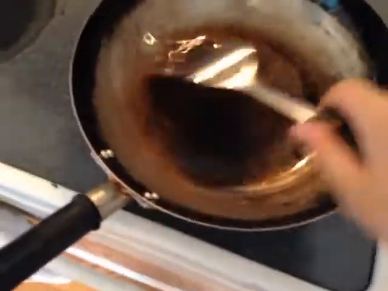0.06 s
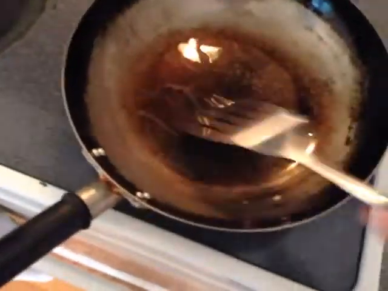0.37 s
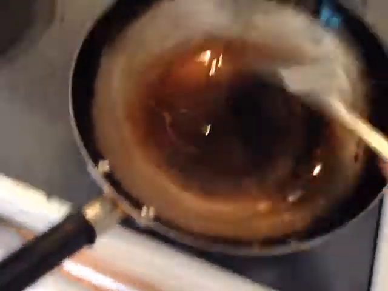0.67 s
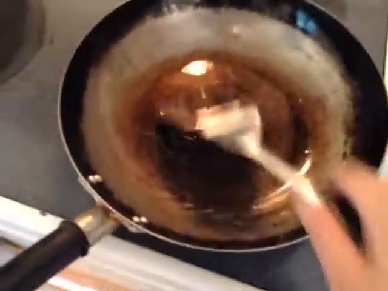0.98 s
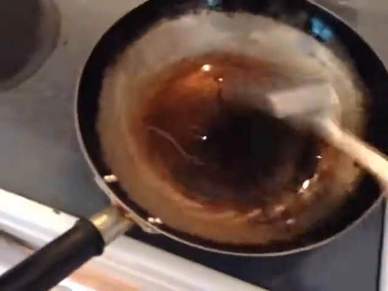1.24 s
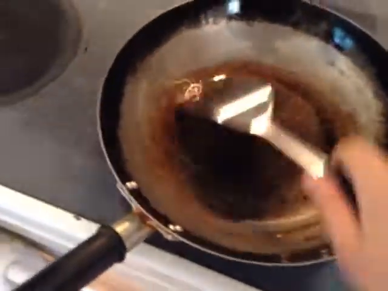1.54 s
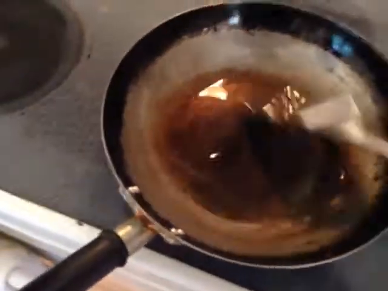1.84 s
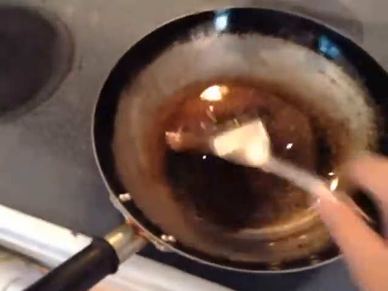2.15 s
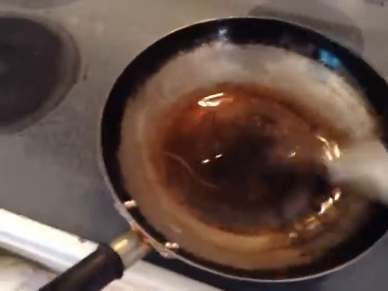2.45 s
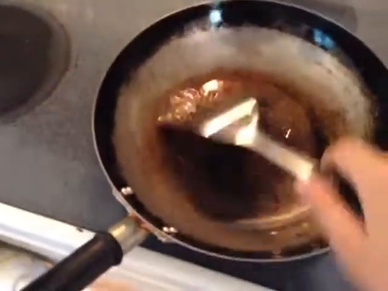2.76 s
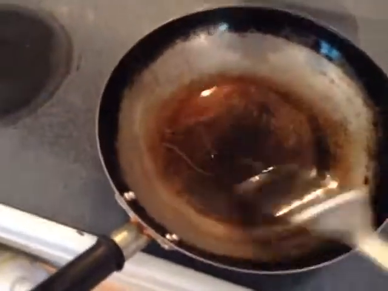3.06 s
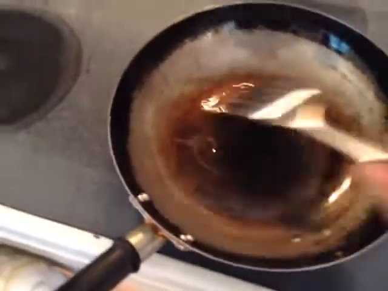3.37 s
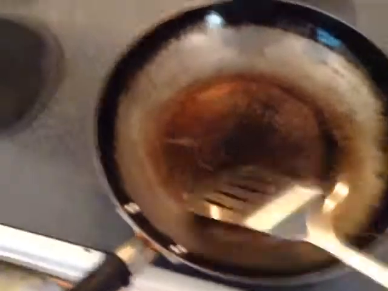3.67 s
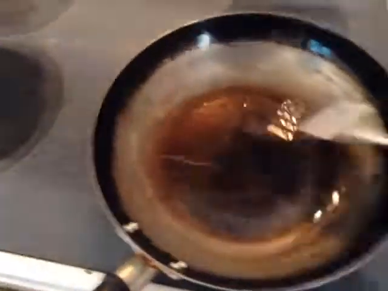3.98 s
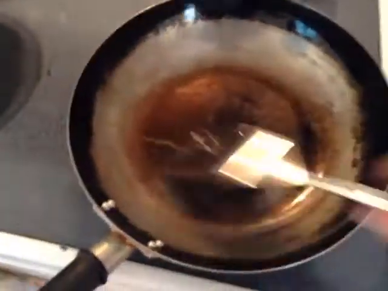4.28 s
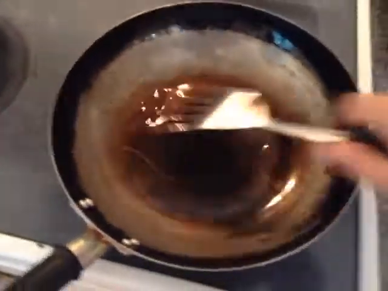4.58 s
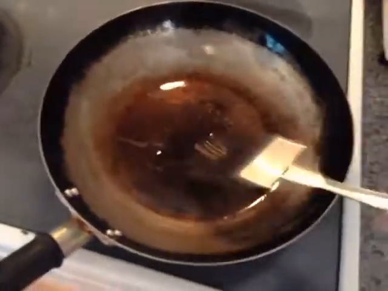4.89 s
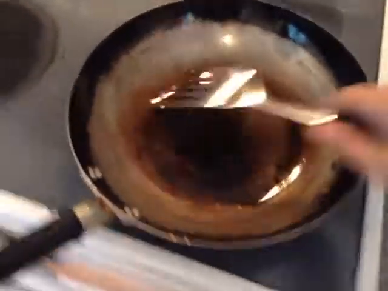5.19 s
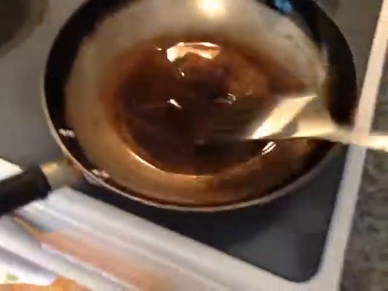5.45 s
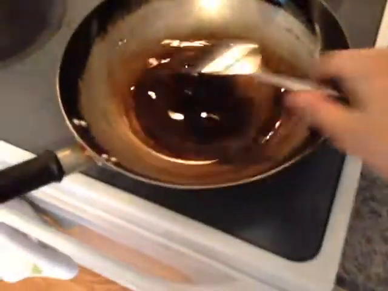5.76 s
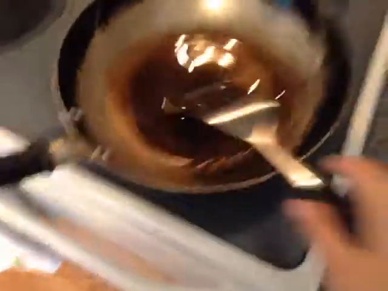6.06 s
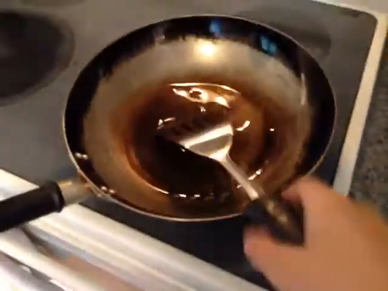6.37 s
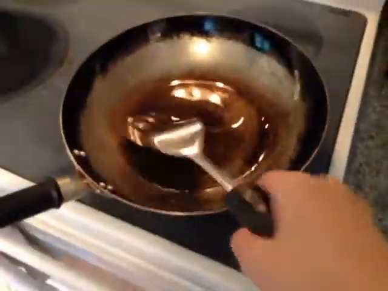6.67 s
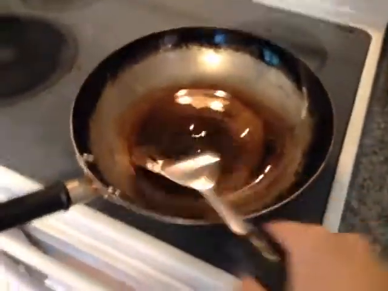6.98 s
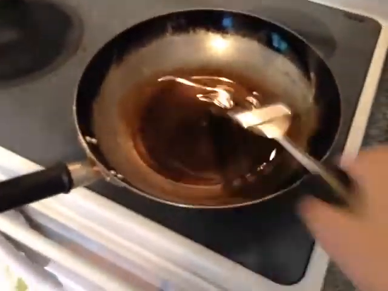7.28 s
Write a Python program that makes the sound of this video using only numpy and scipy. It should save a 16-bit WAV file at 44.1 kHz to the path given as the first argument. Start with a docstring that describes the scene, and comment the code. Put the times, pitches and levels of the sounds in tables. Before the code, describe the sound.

Quick metallic scrapes and ringing clinks of a spatula stirring in a skillet, which knocks dully on the stove in a small kitchen.

```python
"""A slotted metal spatula stirs a film of oil round a steel skillet on a stove in a small kitchen.
The blade lands with a clink, grinds across the pan by stick-slip and lifts off, leaving it ringing.
The pan bumps softly on the hob, air pockets in the oil squelch now and then,
and the room hums faintly."""
import sys
import numpy as np
from scipy import signal
from scipy.fft import rfft, irfft
from scipy.io import wavfile
from scipy.ndimage import uniform_filter1d

SR = 44100
rng = np.random.default_rng(int(sys.argv[2]) if len(sys.argv) > 2 else 0)


def store_pcm(level_fs):
    """Save levels as 16-bit WAV."""
    pcm = np.round(np.clip(level_fs, -1, 1) * 32767).astype(np.int16)
    wavfile.write(sys.argv[1], SR, np.atleast_2d(pcm).T)


N = 323247


def from_db(db):
    """Decibels to gain."""
    return 10 ** (np.asarray(db) / 20)


def unit_rms(x):
    """Scale to rms 1."""
    return x / np.sqrt(np.mean(x ** 2) + 1e-20)


def unit_energy(x):
    """Scale to energy 1."""
    return x / np.sqrt(np.sum(x ** 2) + 1e-20)


def steadied(x):
    """Hold the running rms at 1; the fine grain stays."""
    return x / np.sqrt(uniform_filter1d(x ** 2, size=1300) + 1e-9)


def seconds(length_s):
    """Time axis."""
    return np.arange(int(length_s * SR)) / SR


def decay(t, t60_s):
    """Envelope falling 60 dB in t60_s."""
    return np.exp(-np.log(1000) * t / max(t60_s, .002))


def add(out, start_s, x):
    """Mix x into out from start_s."""
    i = max(int(start_s * SR), 0)
    out[i:i + len(x)] += x[:len(out) - i]


def drift(per_s, size):
    """Random wander: straight lines between unit Gaussian knots."""
    knots = rng.standard_normal(4096)
    return np.interp(np.arange(size) * per_s / SR, np.arange(len(knots)), knots)


def butter(x, order, edge_hz, kind="low"):
    """Butterworth filter."""
    return signal.sosfilt(signal.butter(order, edge_hz, kind, fs=SR, output="sos"), x)


def convolved(x, response):
    """x through an impulse response, cut to the length of x."""
    return signal.fftconvolve(x, response)[:len(x)]


def coloured(x, spectrum):
    """Minimum-phase filter from rows of f/Hz, level/dB."""
    size = 4096
    hz, db = np.transpose(spectrum)
    grid_hz = np.maximum(np.fft.rfftfreq(size, 1 / SR), 1)
    gain = from_db(np.interp(np.log(grid_hz), np.log(hz), db))
    cepstrum = irfft(np.log(gain))
    cepstrum[1:size // 2] *= 2
    cepstrum[size // 2 + 1:] = 0
    return convolved(x, irfft(np.exp(rfft(cepstrum))))


# Low/mid and mid/top crossovers: f/Hz
CROSSOVERS_HZ = [2600, 6000]


def three_bands(x):
    """Low, mid and top band."""
    low_hz, high_hz = CROSSOVERS_HZ
    return [butter(x, 4, low_hz), butter(x, 4, CROSSOVERS_HZ, "band"), butter(x, 4, high_hz, "high")]


def modes(rows, t, spread_db, split=0.0024):
    """Beating mode pairs from rows of f/Hz, level/dB, t60/s; the spot touched sets strength and sign."""
    out = 0
    for (hz, db, t60_s), (strength, sign, detune) in zip(rows, rng.standard_normal((len(rows), 3))):
        pair = np.sin(2 * np.pi * hz * t) + .5 * np.sin(2 * np.pi * hz * (1 + split * detune) * t)
        out = out + np.sign(sign) * from_db(db + spread_db * strength) * pair * decay(t, t60_s)
    return unit_energy(out)


def radiated(x, corner_hz=820):
    """Small plates radiate almost no bass."""
    return butter(x, 2, corner_hz, "high")


def slips(size, per_s, spread_db):
    """Tiny catches of the blade's edge, random in time, size and sign."""
    heights = from_db(spread_db * np.minimum(rng.exponential(1, size), 4))
    signs = rng.choice([-1, 1], size)
    return unit_rms(heights * signs * (rng.random(size) < per_s / SR))


# Spectrum of the metal: f/Hz, level/dB
METAL_SPECTRUM = [(250, -48.5), (500, -33), (800, -8.5), (1080, 3), (2100, -3.5), (3000, -5), (4600, 1),
                  (6200, -1), (9400, 4), (11000, -12), (14000, -41.5)]


def metal_burst(t, t60_s):
    """Dense, short-lived metal modes as decaying noise."""
    return unit_energy(coloured(rng.standard_normal(len(t)) * decay(t, t60_s), METAL_SPECTRUM))


# Resonances of blade and pan pressed together: f/Hz, nominal width/Hz, level/dB
CONTACT_MODES = [(1100, 100, -4), (1410, 36, -2), (1860, 40, -7), (2090, 50, -2), (2430, 29, -3),
                 (2900, 39, -7), (3290, 47, -2), (3540, 44, -5), (3850, 67, -2), (4120, 23, -6),
                 (4400, 40, -3), (4830, 56, -1), (5250, 37, -3), (5540, 71, -2), (6050, 69, 0),
                 (6310, 41, 0), (6930, 140, -2), (7500, 64, -2), (8020, 86, -6), (9150, 160, -4),
                 (9830, 54, -8)]


def contact_response(sustain, dense_db, dense_t60_s, spread_db):
    """Impulse response of blade on pan: clear resonances over dense modes."""
    t = seconds(.25)
    max_t60_s = .09  # the touching blade damps even the sharpest resonance
    rows = [(hz, db, min(sustain * np.log(1000) / (np.pi * width_hz), max_t60_s))
            for hz, width_hz, db in CONTACT_MODES]
    dense = metal_burst(t, dense_t60_s)
    return modes(rows, t, spread_db) + from_db(dense_db) * dense


def tine_glide(x, depth=0.028, per_s=11):
    """A tine's upper resonances slide as its contact point moves; the low ones stay."""
    low, mid, top = three_bands(x)
    warped = np.cumsum(1 + depth * drift(per_s, len(x)))
    return low + np.interp(np.arange(len(x)), warped, mid + top)


def tines(force, wander_db=6.9):
    """The load wanders between two tines, each with its own mix of resonances."""
    loads = [force * from_db(wander_db * drift(11.8, len(force))) for _ in range(2)]
    held, sliding = [
        convolved(load, contact_response(sustain=3.3, dense_db=1.0, dense_t60_s=0.048, spread_db=5.5))
        for load in loads]
    return radiated(held + tine_glide(sliding))


def wall_echo(x, t, gain=0.46, median_lag_s=0.0007125):
    """Add the echo off the pan's wall, which shifts as the blade travels."""
    lag_s = median_lag_s * from_db(2.495 * drift(5.54, len(t)))
    return x + gain * np.interp(t - lag_s, t, x)


# Low plate modes under the dragged blade: f/Hz, level/dB, t60/s
PLATE_MODES = [(1072, -3.5, 0.09), (1520, 0, 0.039), (2070, -1, 0.045)]


def plate_hum(force):
    """Dragging keeps the low plate modes humming."""
    return steadied(convolved(force, modes(PLATE_MODES, seconds(0.11), spread_db=3.0)))


def blade_bending(hz, width_hz=70):
    """Randomly driven bending resonance whose centre follows hz."""
    shaking = rng.standard_normal(len(hz)) + 1j * rng.standard_normal(len(hz))
    swing = butter(shaking, 2, width_hz / 2)
    return unit_rms(np.real(swing * np.exp(2j * np.pi * np.cumsum(hz) / SR)))


def pressure_db(t, start_s, crest_s, end_s, swell_db_per_s=30, ease_db_per_s=59, waver_db=.7):
    """Hand pressure re the crest: leans in, eases off, wavers."""
    since_crest_s = np.clip(t, start_s, end_s) - crest_s
    arch_db = np.minimum(swell_db_per_s * since_crest_s, -ease_db_per_s * since_crest_s)
    return arch_db + waver_db * drift(29.4, len(t))


# Low resonances of the stove top: f/Hz, nominal width/Hz, level/dB
HOB_MODES = [(213.6, 38, -1), (363.3, 52, 4.5), (645, 160, 1.5)]


def hob_boom(force, sustain=3.4):
    """The stove top booms under a force."""
    rows = [(hz, db, sustain * np.log(1000) / (np.pi * width_hz)) for hz, width_hz, db in HOB_MODES]
    return convolved(force, modes(rows, seconds(.5), spread_db=5.0))


# Modes of the free pan: f/Hz, level/dB, t60/s
PAN_MODES = [(1008, 0, 0.45), (1408, -3, 0.4), (1862, -8, 0.38), (2085, -1, 0.27), (2196, -8, 0.8),
             (2433, -1, 0.6), (2900, -8, 0.35), (3290, -4, 0.55), (3850, -3, 0.35), (4120, -6, 0.42),
             (4395, -7, 0.3), (4825, -4, 0.5), (5264, -1, 0.42), (5540, -4, 0.42), (5810, -4, 0.32),
             (6045, -5, 0.3), (6310, -4, 0.28), (6870, -8, 0.45), (7500, -8, 0.38), (8600, -12, 0.35),
             (9030, -13, 0.35), (9650, -16, 0.4)]


def scraped_pan(grind):
    """Grinding drives the pan's modes; same rms as the grind."""
    ring = convolved(grind, modes(PAN_MODES, seconds(.6), spread_db=2.0))
    return np.std(grind) * unit_rms(ring)


def struck_pan(t, favoured_hz, favoured_db=7.5, oil_t60_s=7.8):
    """Free pan, lightly damped by oil, struck at a spot that favours one mode."""
    rows = np.array(PAN_MODES, float)
    nearest = np.argmin(np.abs(rows[:, 0] - favoured_hz))
    rows[nearest, 1] = favoured_db
    return modes(rows, t, spread_db=2.5) * decay(t, oil_t60_s)


# Blade drags: start t/s, crest t/s, end t/s, crest level/dB, low re mid/dB, top re mid/dB,
# bending f/Hz before the crest, bending f/Hz after it
DRAGS = [(0, .065, .085, -24.3, -9, 4, 2130, 2130), (.095, .165, 0.18, -29.5, -14, 2, 1560, 1400),
         (.48, 0.545, 0.64, -28, -8, 1.5, 2080, 1000), (.98, 1.068, 1.146, -31.5, -9, 3, 1038, 1900),
         (1.445, 1.47, 1.605, -27.5, -5, 0.5, 1420, 2300),
         (1.83, 2.181, 2.363, -22.5, -8.5, 1.5, 2085, 2190),
         (2.671, 2.695, 2.71, -32.5, -4.5, 3.5, 2100, 1700),
         (2.746, 2.78, 2.79, -33, -7.5, 1.5, 2120, 2095), (2.895, 2.93, 2.945, -29.5, -9.5, 2, 1505, 1700),
         (3.085, 3.08, 3.174, -29.5, -7.5, 1, 2067, 2000),
         (3.415, 3.424, 3.5, -28.5, -6.5, 0.5, 2090, 2000),
         (3.51, 3.595, 3.68, -27.5, -6.5, 3.5, 2110, 2130), (4.865, 4.984, 5.04, -27, -9, .5, 1684, 1400),
         (5.10, 5.125, 5.145, -29.5, -6.5, 3, 2080, 2120),
         (5.221, 5.315, 5.335, -28.5, -7.5, 2, 2094, 1437), (5.485, 5.573, 5.64, -25.5, -6, 0, 1030, 1340),
         (5.775, 5.81, 5.79, -29.5, -4.5, -0.5, 2370, 2500), (6.049, 6.058, 6.068, -31, 0, 0, 1126, 970),
         (6.11, 6.23, 6.315, -27.8, -3, 1, 1092, 1600), (6.365, 6.464, 6.515, -29, -5, -.5, 1476, 2540),
         (7.145, 7.161, 7.21, -31, -1.5, -0.5, 1040, 1040)]


def scrapes(level_db=-0.79, judder_db=2.5, bite_s=0.0062, lift_s=0.015, top_db_per_db=0.15,
            plate_db=-7, bend_db=-13, rumble_db=-34, ring_db=-17.5):
    """The edge sticks and slips under a juddering hand; more pressure is louder and brighter."""
    out = np.zeros(N)
    for start_s, crest_s, end_s, crest_db, low_db, top_db, early_hz, late_hz in DRAGS:
        first_s = max(start_s - .04, 0)
        t = first_s + seconds(end_s - first_s + .7)
        force = slips(len(t), per_s=2800, spread_db=2.0) * from_db(judder_db * drift(110.1, len(t)))
        grind = steadied(wall_echo(tines(force), t))
        grind += from_db(plate_db) * plate_hum(force)
        bend_hz = np.where(t < crest_s, early_hz, late_hz)  # the edge reseats at the crest
        grind += from_db(bend_db) * blade_bending(bend_hz)
        press_db = pressure_db(t, start_s, crest_s, end_s)
        bands_db = (low_db, 0, top_db + top_db_per_db * press_db)
        grind = sum(from_db(db) * steadied(band) for db, band in zip(bands_db, three_bands(grind)))
        grind += from_db(rumble_db) * unit_rms(hob_boom(force))
        contact = np.exp(-np.maximum(start_s - t, 0) / bite_s - np.maximum(t - end_s, 0) / lift_s)
        grind *= from_db(crest_db + press_db) * contact
        add(out, first_s, from_db(level_db) * (grind + from_db(ring_db) * scraped_pan(grind)))
    return out


# Room noise ahead of its low-pass: f/Hz, level/dB
ROOM_SPECTRUM = [(24, -55.5), (40, -43), (233, 2.5), (440, -6.5), (829, -6), (1050, -9), (1680, -14),
                 (2120, -13), (2280, -14), (5310, -6), (9330, -13.5), (10300, -30), (11000, -42.5),
                 (14300, -59), (22000, -120)]


def room_hum(rush_db=-59, corner_hz=1800, mains_hz=121.4, mains_db=-70.5):
    """Soft steady rush of the room with a mains tone."""
    rush = butter(coloured(rng.standard_normal(N), ROOM_SPECTRUM), 1, corner_hz)
    mains = np.sqrt(2) * np.sin(2 * np.pi * mains_hz * np.arange(N) / SR)
    return from_db(rush_db) * unit_rms(rush) + from_db(mains_db) * mains


# Spectrum of a knock: f/Hz, level/dB
KNOCK_SPECTRUM = [(60, -35), (110, -11.5), (160, 0), (330, -1), (470, -7), (800, -3), (2000, -10.5),
                  (5000, -22), (11000, -42)]
# Knocks of pan on hob: t/s, level/dB
KNOCKS = [(0.004, -36), (0.039, -33.5), (0.175, -27.5), (0.319, -31), (0.407, -41), (0.596, -39.5),
          (0.786, -42), (1.225, -49.5), (1.37, -48), (1.422, -37.5), (1.791, -43), (2.094, -31.5),
          (2.213, -35), (2.382, -31.5), (2.573, -37.5), (2.733, -46.5), (2.975, -40), (3.203, -38.5),
          (3.371, -38), (4.47, -38.5), (5.976, -43.5), (6.514, -38.5)]


def bumps(level_db=-5.0, t60_s=0.19, boom_db=-6.0):
    """The pan's base knocks dully on the hob, which booms briefly."""
    out, t = np.zeros(N), seconds(.5)
    attack_samples = SR // 50
    for start_s, knock_db in KNOCKS:
        force = rng.standard_normal(len(t)) * decay(t, t60_s)
        knock = unit_energy(coloured(force, KNOCK_SPECTRUM))
        knock += from_db(boom_db) * unit_energy(hob_boom(force))
        add(out, start_s, from_db(knock_db + level_db) * knock / np.std(knock[:attack_samples]))
    return out


# Air pockets in oil squeezed under the blade: t/s, length/s, start f/Hz, end f/Hz, level/dB
AIR_POCKETS = [(0.093, 0.056, 596, 1574, -40), (0.146, 0.034, 1740, 1323, -39),
               (2.844, 0.026, 1580, 2020, -35)]


def squelches(waver=0.083, rough_db=4.5):
    """An air pocket in the oil sputters and glides in pitch as it changes size."""
    out = np.zeros(N)
    for start_s, length_s, start_hz, end_hz, db in AIR_POCKETS:
        t = seconds(length_s)
        hz = np.geomspace(start_hz, end_hz, len(t)) * (1 + waver * drift(600, len(t)))
        swell = np.sqrt(np.abs(np.sin(np.pi * t / length_s)))
        sputter = from_db(db + rough_db * drift(500, len(t)))
        add(out, start_s, swell * sputter * np.sin(2 * np.pi * np.cumsum(hz) / SR))
    return out


def blade_impact(t, chatter_t60_s, bend_hz, chatter_db=8.0, snap_db=-7.0, bend_db=-11, bend_t60_s=0.27):
    """The blade hits with a snap, bends and chatters briefly."""
    chatter = slips(len(t), per_s=3200, spread_db=1.0) * decay(t, chatter_t60_s)
    force = from_db(chatter_db) * unit_energy(chatter)
    force[0] += 1  # the blow itself
    response = contact_response(sustain=3.2, dense_db=-1.0, dense_t60_s=0.12, spread_db=8.0)
    clash = unit_energy(convolved(force, response))
    snap = metal_burst(t, t60_s=0.026)
    bend = modes([(bend_hz, 0, bend_t60_s)], t, spread_db=0)
    return radiated(clash + from_db(snap_db) * snap + from_db(bend_db) * bend)


# Blade landings: t/s, level/dB, low re mid/dB, top re mid/dB, bending f/Hz, favoured pan mode f/Hz
LANDINGS = [(0.177, -36, 8, -19, 1037, 1408), (0.319, -40.5, 7, -16, 1138, 1408),
            (0.417, -18, -7, -3, 2035, 3290), (0.935, -19, -7.5, 2, 2170, 4395),
            (1.421, -17, -6, 1.5, 1408, 2085), (1.792, -20, -8.5, 5.5, 2050, 3850),
            (2.561, -42, 4, -29.5, 2060, 2085), (2.589, -15, -5.5, 0, 2097, 2085),
            (2.884, -33.5, -12, -6, 1590, 6045), (3.052, -17.5, -7, -0.5, 1938, 5264),
            (3.375, -18.5, -6.5, 0, 2126, 2085), (3.98, -18.5, -4.5, 0.5, 1450, 1408),
            (4.252, -19, -2.5, 2.5, 1410, 3290), (4.347, -28, -2.5, 0.5, 1456, 3290),
            (4.468, -21.5, -8.5, 2.5, 1365, 2433), (4.612, -17, -5.5, 4, 1477, 1008),
            (4.640, -19.5, -2.5, 3, 1530, 1008), (4.819, -24.5, -0.5, 2, 1507, 1408),
            (5.212, -31, -23, 3.5, 1267, 5264), (5.449, -23, 0, -1, 1507, 1008),
            (5.761, -27, -8, 5, 2140, 2433), (5.953, -47.5, 4, -8, 2040, 3850),
            (5.979, -18, -1.5, -1.5, 1083, 4395), (6.104, -32, -10, -2, 1070, 1008),
            (6.441, -28, -1.5, 7, 2380, 5264), (6.747, -17, 2, 2.5, 2437, 2433),
            (7.084, -16.5, -3, -2, 1464, 1008)]


def clinks(firm_db=-18, firm_chatter_t60_s=.052, chatter_doubling_db=16.5,
           firm_ring_db=-10.5, ring_db_per_db=0.92, held_db=-4, held_within_s=.09):
    """Each landing sets the pan ringing; harder blows chatter longer."""
    out, t = np.zeros(N), seconds(.9)
    attack_samples = int(.012 * SR)
    for start_s, blow_db, low_db, top_db, bend_hz, favoured_hz in LANDINGS:
        excess_db = blow_db - firm_db
        chatter_t60_s = firm_chatter_t60_s * 2 ** (excess_db / chatter_doubling_db)
        bands = three_bands(blade_impact(t, chatter_t60_s, bend_hz))
        clash = sum(from_db(db) * band / np.std(band[:attack_samples])
                    for db, band in zip((low_db, 0, top_db), bands))
        # less ring after a dull touch, or if the blade stays down for a drag
        held = any(0 < drag_s - start_s < held_within_s for drag_s, *_ in DRAGS)
        ring_db = firm_ring_db + (ring_db_per_db - 1) * excess_db + held * held_db + min(top_db, 0)
        ring = from_db(ring_db) * np.linalg.norm(clash) * struck_pan(t, favoured_hz)
        add(out, start_s, from_db(blow_db) * (clash + radiated(ring)))
    return out


def kitchen(x, wet_db=-13, band_t60s_s=(0.56, 0.44, 0.34), build_s=0.0028):
    """Add the diffuse echo of a small hard room; treble dies first."""
    t = seconds(.7)
    bands = three_bands(rng.standard_normal(len(t)))
    tail = sum(band * decay(t, t60_s) for band, t60_s in zip(bands, band_t60s_s))
    response = unit_energy(tail * (1 - np.exp(-t / build_s)))
    return x + from_db(wet_db) * convolved(x, response)


def scene():
    """The stove heard in the room, mono."""
    stove = clinks() + scrapes() + bumps() + squelches()
    return (kitchen(stove) + room_hum())[None]


# Overall tone colour, slight lift near 3.6 kHz, slight dip near 5.8 kHz: f/Hz, level/dB
TONE_COLOUR = [(1600, 0.3), (2300, -0.8), (3600, 1.8), (4700, -0.2), (5800, -1.8), (7500, 0.3)]


def record(dry, ceiling=.95, low_cut_hz=120, high_cut_hz=10900):
    """Colour the tone slightly, round the highest peaks, cut deep bass and top."""
    heard = coloured(dry[0], TONE_COLOUR)[None]
    rounded = ceiling * np.tanh(heard / ceiling)
    thin = butter(rounded, 3, low_cut_hz, "high")
    return signal.sosfilt(signal.ellip(10, .5, 70, high_cut_hz, fs=SR, output="sos"), thin)


dry = scene()
out = record(dry)
store_pcm(out)
```